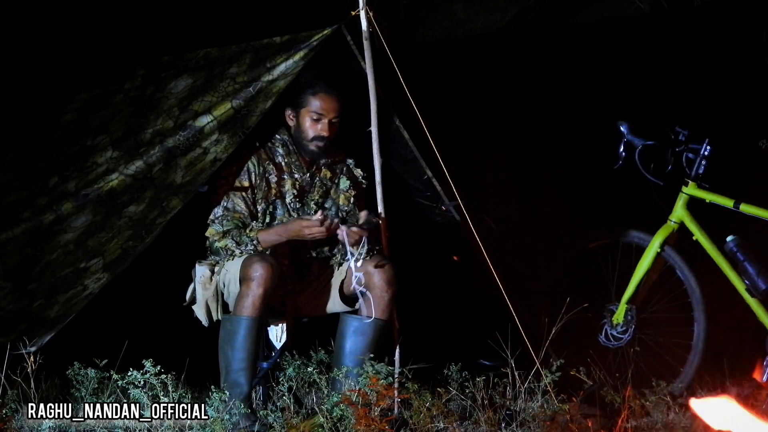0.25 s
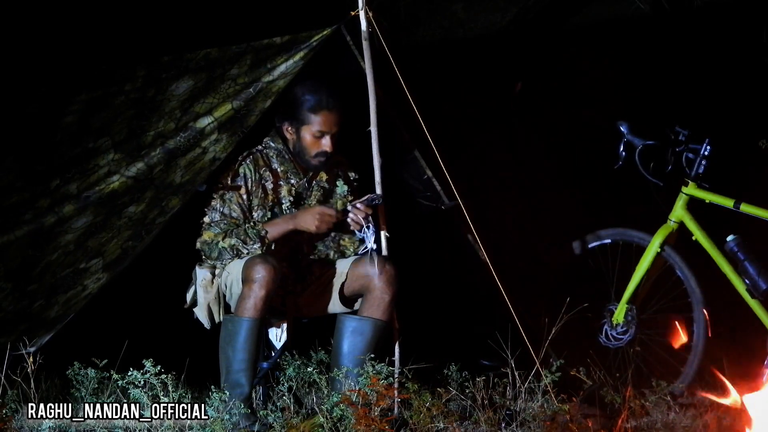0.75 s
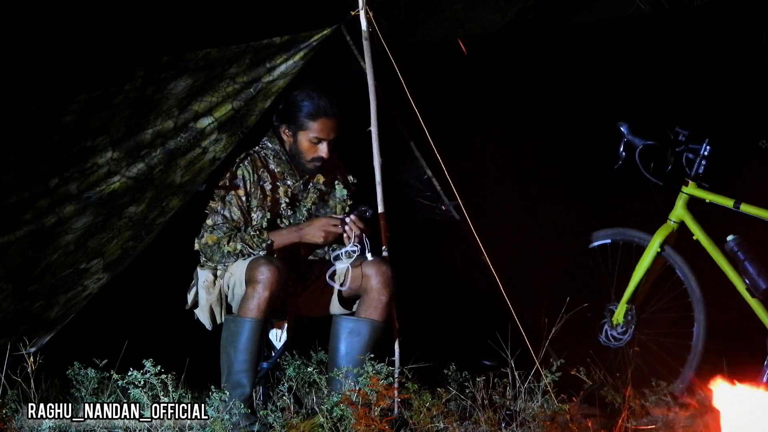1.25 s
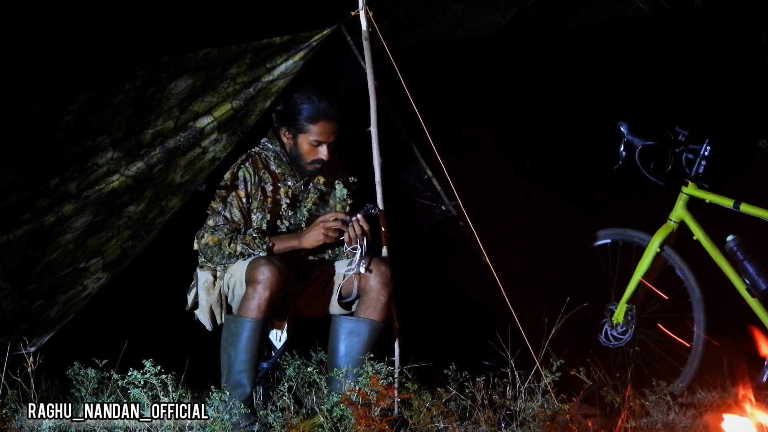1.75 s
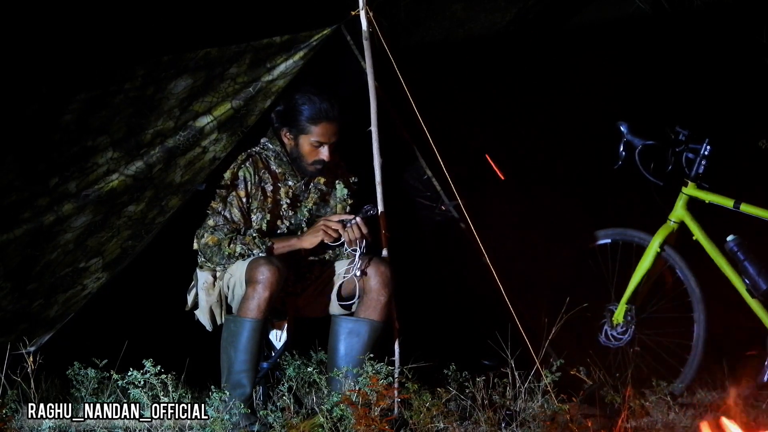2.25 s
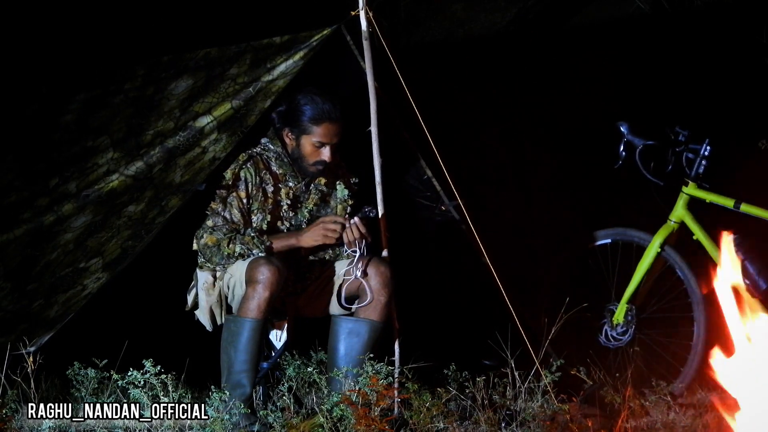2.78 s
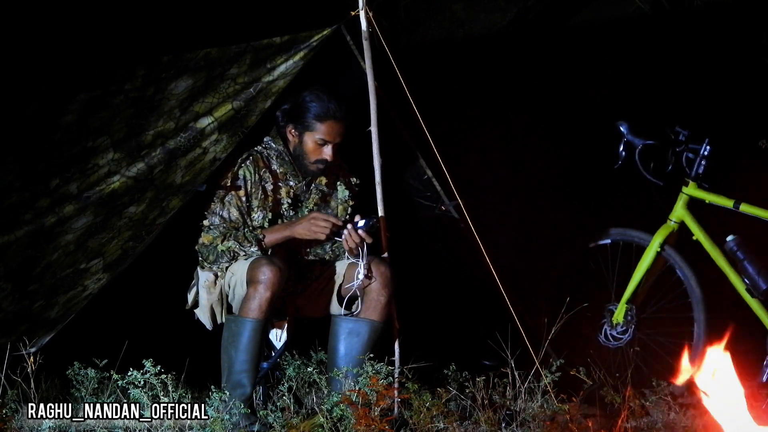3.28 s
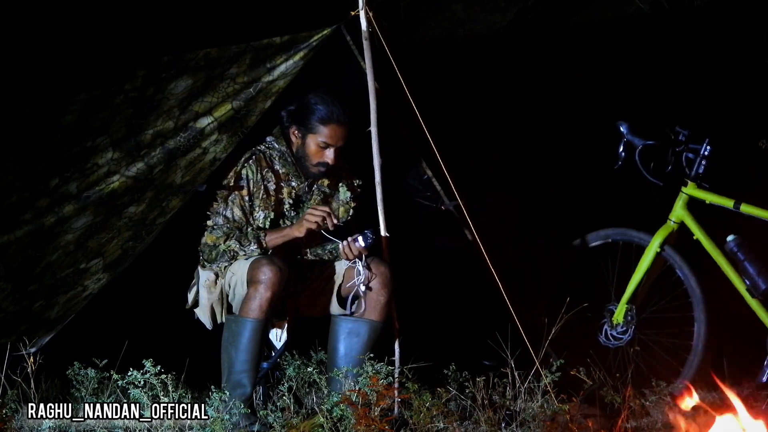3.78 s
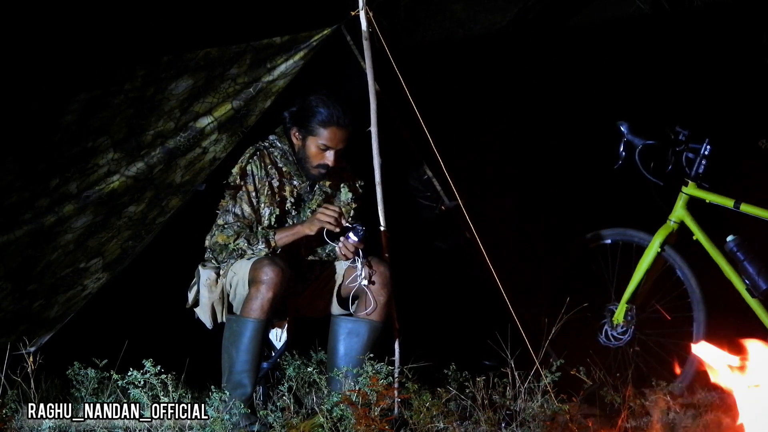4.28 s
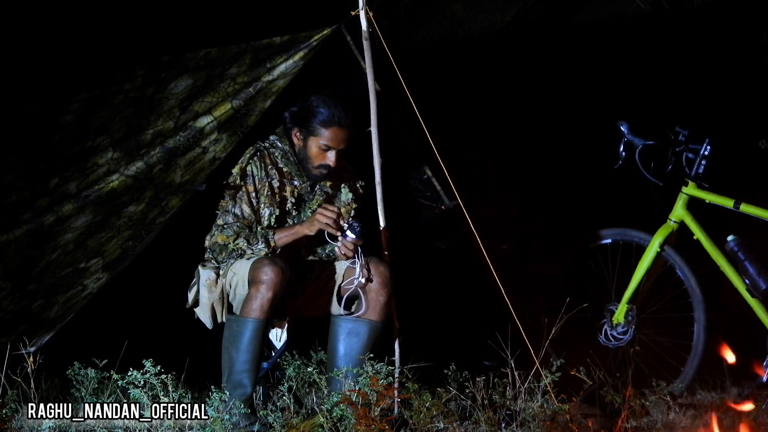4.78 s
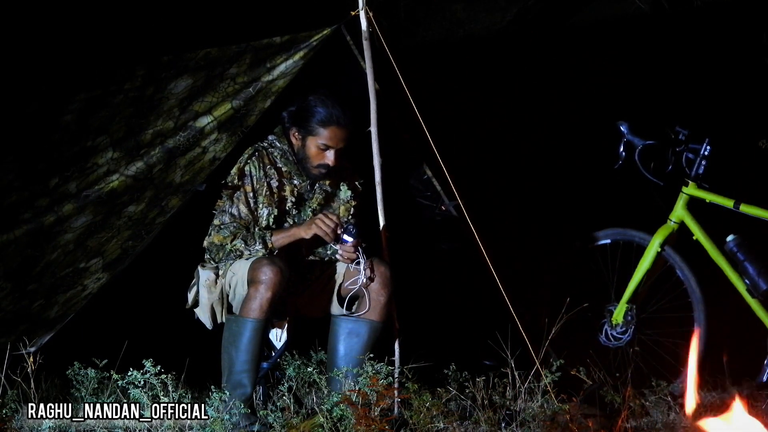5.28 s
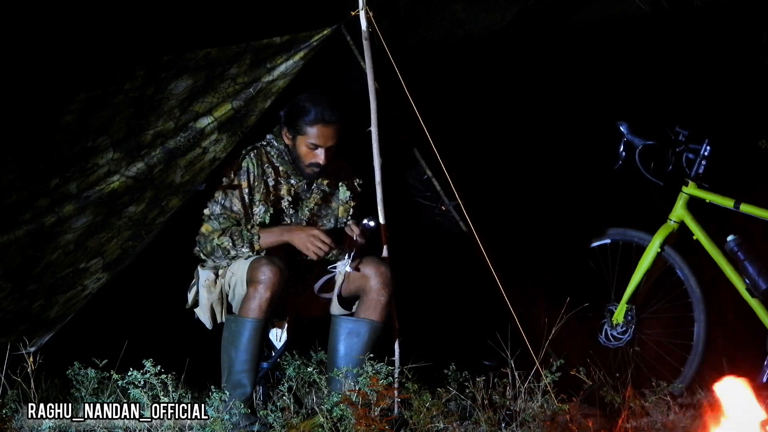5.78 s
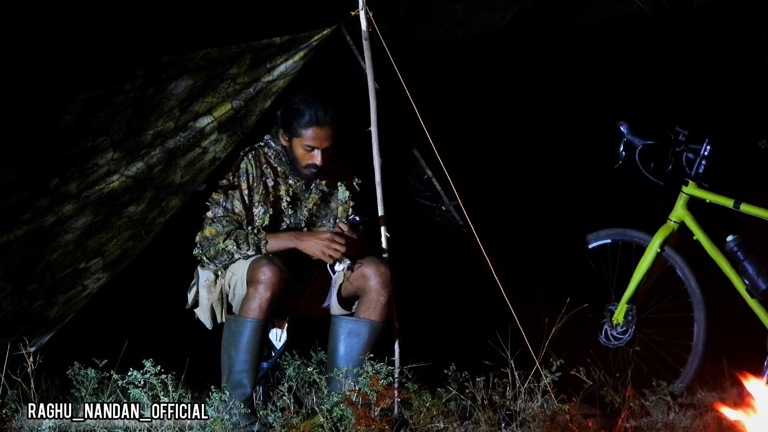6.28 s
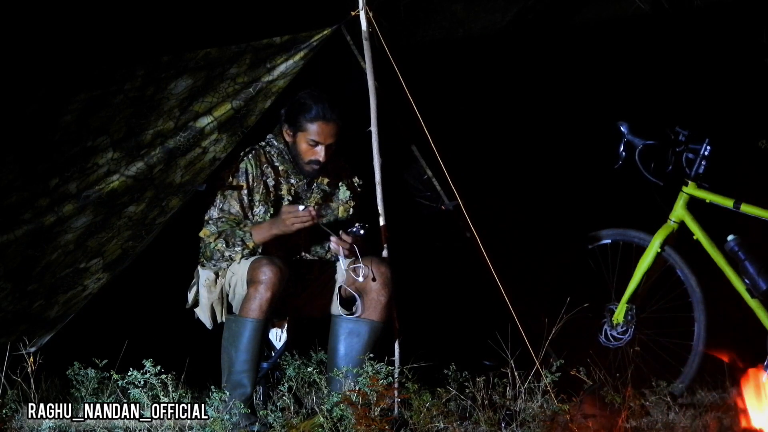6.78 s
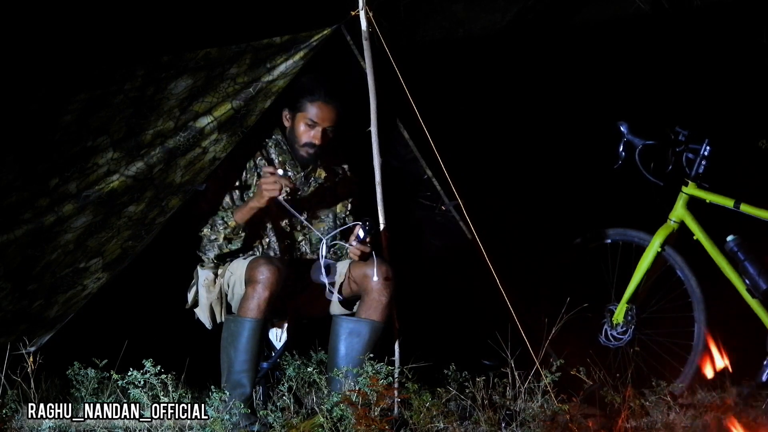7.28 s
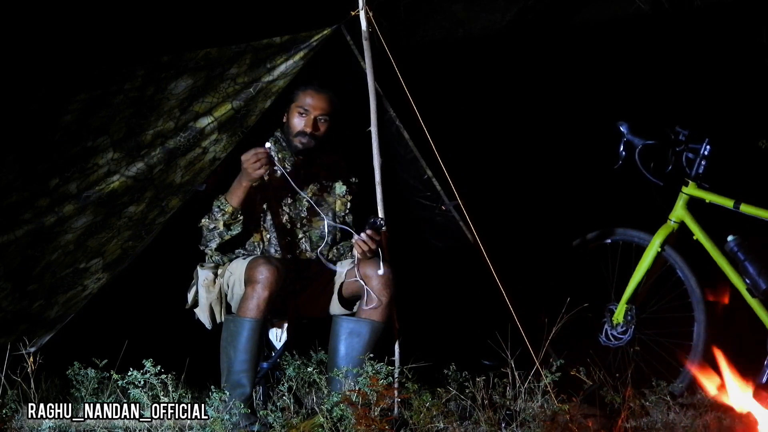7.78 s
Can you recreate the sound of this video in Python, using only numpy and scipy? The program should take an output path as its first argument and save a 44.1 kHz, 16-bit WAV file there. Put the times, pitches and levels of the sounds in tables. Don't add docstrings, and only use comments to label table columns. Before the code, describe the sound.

Fast high cricket chirping and buzzing insects fill the dark scrub as a campfire crackles softly, with sharp pops and a loud split near six seconds.

```python
import sys
import numpy as np
from scipy import signal
from scipy.io import wavfile
from scipy.ndimage import uniform_filter1d

SR = 44100
rng = np.random.default_rng(int(sys.argv[2]) if len(sys.argv) > 2 else 0)


def generate_wav(signal):
    frames = np.transpose(np.atleast_2d(signal))
    scaled = np.clip(frames, -1, 1) * 32767
    pcm = np.round(scaled).astype(np.int16)
    wavfile.write(sys.argv[1], SR, pcm)


def level_to_linear(level):
    exponent = np.asarray(level, float) / 20
    return 10 ** exponent


N = 354769
TIME = np.arange(N) / SR


def evened(x):
    return x / np.sqrt(np.mean(abs(x) ** 2) + 1e-20)


def curve(rows, column=1):
    return np.interp(TIME, [r[0] for r in rows], [r[column] for r in rows])


def sides(pan_db, lead_rad=0.):
    return np.array([[level_to_linear(pan_db / 2) * np.exp(1j * lead_rad)], [level_to_linear(-pan_db / 2)]])


def add(mix, s, sound):
    part = mix[:, round(s * SR):][:, :sound.shape[-1]]
    part += sound.real[..., :part.shape[1]]


def play(times_s, gains, sound):
    train = np.zeros(N, complex)
    index = np.round(np.asarray(times_s) * SR).astype(int)
    np.add.at(train, np.clip(index, 0, N - 1), gains)
    return signal.oaconvolve(train, sound)[:N]


def beats(first_s, last_s, gap_s):
    u = np.linspace(0, 1, round((last_s - first_s) / gap_s) + 1)
    return first_s + u * (last_s - first_s), u


def stroke(start_hz, end_hz, length_s, rise):
    u = np.arange(round(length_s * SR)) / (length_s * SR)
    skew = np.log(.5) / np.log(np.clip(rise, .05, .95))
    shape = np.sin(np.pi * u ** skew) ** 2
    return shape * np.exp(2j * np.pi * np.cumsum(start_hz + (end_hz - start_hz) * u) / SR)


def leaves(x, t60_s, wet_db):
    t = np.arange(SR // 6) / SR
    taps = rng.choice([-1., 1.], (2, len(t))) * (rng.random((2, len(t))) < .05)
    taps *= level_to_linear(-60 * t / t60_s)
    taps /= np.linalg.norm(taps, axis=1, keepdims=True)
    return x + level_to_linear(wet_db) * signal.oaconvolve(x, taps, axes=1)[:, :N]


def near_cricket():
    # (first [s], last [s], first level [dB], last level [dB], mid-run haste [ms])
    runs = [
        (0.045, 1.4514, -35.5, -35, 6.6),
        (1.569, 2.692, -34, -34, 9.1),
        (2.7993, 3.8233, -34, -35.7, 11.3),
        (3.9444, 4.9525, -36.2, -38, 8.6),
        (5.034, 5.155, -38, -37, 3),
        (5.271, 5.9313, -37, -36.5, 12),
        (6.0436, 6.893, -35.5, -36, 12),
        (7.0086, 7.965, -35.8, -33.5, 5),
    ]
    times, levels = [], []
    for first, last, a_db, b_db, haste_ms in runs:
        t, u = beats(first, last, .0602)
        times.append(t - haste_ms / 1000 * np.sqrt(abs(np.sin(np.pi * u))))
        levels.append(a_db + (b_db - a_db) * u)
    s, db = np.hstack(times), np.hstack(levels)
    chance = rng.random((len(s), 4))
    one = stroke(8200, 6518, 0.0155, 0.49)
    x = 0
    for k, gap_s in enumerate((-.0005, .0192)):
        gains = level_to_linear(db - 6.0 + 3.9 * chance[:, k]) * np.exp(2j * np.pi * chance[:, k + 2])
        x = x + play(s + gap_s, gains, one)
    x = x + .36 * np.roll(x, round(.0033 * SR)) + .22 * np.roll(x, round(.0074 * SR))
    return leaves((sides(-8, -0.022) * x).real, 0.042, -1.8)


def pop(cycle_ms, thump_db):
    t_ms = np.arange(900) / SR * 1000
    u = t_ms / max(cycle_ms, .1)
    burst = -1.3 * np.sin(2 * np.pi * (u - .1)) * np.exp(-((u - .55) / 0.44) ** 2)
    late = np.maximum(t_ms - 2.4, 0) / 3.64
    return burst + level_to_linear(thump_db + 6.5) * np.sin(2 * np.pi * late) * np.exp(-1.1 * late)


def pops():
    # (time [s], peak [dB], cycle [ms], left-right [dB])
    light = [(.529, -21.5, .89, -2.5), (.823, -32, .84, -5.5), (1.942, -31, 0.87, 0),
             (2.159, -27, 0.58, -6), (2.506, -37.5, 0.73, 0), (2.613, -36.5, 0.87, 0),
             (3.111, -40, 0.54, -1.5), (3.708, -40.5, 0.51, 2.0), (4.034, -41.5, .98, -4),
             (4.056, -41, 1, -6), (4.62, -32.5, 0.56, 0), (4.751, -40.5, .73, -.5), (4.85, -42.5, 0.87, -6),
             (5.422, -36, 1, 0), (5.956, -40.5, 0.86, -1), (6.066, -23, .63, -4), (6.687, -33.5, 0.68, 0),
             (7.068, -36.5, 1, 0), (7.196, -38, 1, 0), (7.406, -37, .99, -.5), (7.489, -43, 1, -.5)]
    # (time [s], peak [dB])
    faint = [(.472, -49), (1.284, -49), (1.79, -48), (1.837, -48), (2.799, -44), (2.869, -52), (4.404, -56),
             (4.448, -50), (5.492, -46), (5.788, -49), (6.17, -51), (7.591, -44.5)]
    # (time [s], peak [dB], cycle [ms], thump re peak [dB], left-right [dB])
    heavy = [
        (1.591, -50, .94, 5, 0),
        (2.356, -16, 0.83, -12.5, -4.5),
        (2.475, -45, 1, -2, 0),
        (3.024, -44.5, 1, -3, -5),
        (3.2, -50, .73, 2, -3),
        (4.341, -42.5, 1, -8, 0),
        (5.639, -48, .92, 5, -1.5),
        (6.094, -21, 0.79, -29, -1),
        (6.351, -43, 0.65, -9, 2.0),
    ]
    settle = [
        (6.098, -37, 2.3, -30, -2),
        (6.1014, -31, 1.7, -30, -2),
        (6.105, -37, 2, -33, -2),
    ]
    events = [(s, db, ms, -58.5 - db, pan_db) for s, db, ms, pan_db in light]
    events += [(s, db, .98, -58.5 - db, -.5) for s, db in faint]
    x = np.zeros((2, N))
    for s, db, cycle_ms, thump_db, pan_db in events + heavy + settle:
        add(x, s + .0006, sides(pan_db) * level_to_linear(db + 1) * pop(cycle_ms, thump_db))
    crackles = level_to_linear(-67.5 + 6.7 * np.minimum(rng.exponential(1, N), 3))
    crackles *= rng.random(N) < 45 / SR
    x += signal.oaconvolve(crackles, pop(0.95, -18))[:N]
    return leaves(x, .06, -16)


def ticks():
    # (time [s], peak [dB], body re peak [dB], left-right [dB])
    sparks = [(0.614, -25.5, -35, -3.0), (0.7906, -31, -33, -5.0), (0.823, -23, -35, -2.5),
              (1.029, -30, -32, -2.0), (1.1717, -29.5, -31, -3.0), (1.2474, -22.5, -41, 0.0),
              (1.4012, -26, -44, -4.0), (1.837, -25, -49, -2.0), (2.1595, -20.5, -37, 1),
              (2.351, -29, -22.5, -5.0), (3.1113, -33.5, -32, -6.5), (3.4211, -29, -40, -5.0),
              (3.8117, -33, -36, -5.5), (3.953, -27, -29, -4.5), (3.9903, -31, -31, -5.0),
              (4.0562, -27, -31.5, -2), (4.1175, -29, -34, -5.0), (4.1902, -21, -33, 1),
              (4.5416, -30, -43, -3.0), (4.7127, -25.5, -36, -2), (4.8504, -32, -43, -1),
              (5.0384, -28, -33, -4), (5.8512, -30, -29, -2), (6.3899, -34, -35, -8),
              (7.5937, -34, -35, -3), (7.9129, -26, -34, -3.0), (7.9279, -27, -48, -2)]
    snap = [
        (6.0635, -30, -36, 0),
        (6.0656, -18, -19, -1),
        (6.094, -36, -14, -3),
    ]
    x = np.zeros((2, N))
    t = np.arange(300) / SR
    bright = signal.butter(2, [8600, 13000], "band", fs=SR, output="sos")
    for s, db, body_db, pan_db in sparks + snap:
        burst = .12 * rng.standard_normal(len(t)) * level_to_linear(-60 * t / .006) - (t == 0)
        body = np.convolve(burst, np.hanning(5))[:len(t)]
        tick = 7.7 * signal.sosfilt(bright, burst) + level_to_linear(body_db + 30.0) * body
        add(x, s + .0012, sides(pan_db) * level_to_linear(db - 1.5) * tick)
    return leaves(x, .03, -9)


def katydid(per_s, level_db, pan_db):
    # (time [s], direct stroke [dB], leaf echo [dB])
    buzz = [(0.0, -53.5, -51), (0.36, -50.5, -52), (0.94, -55, -61), (4.07, -51, -54.5), (5.93, -54.5, -53),
            (6.54, -49, -50), (8.04, -50.5, -53)]
    s = np.arange(0, N / SR, 1 / per_s)
    chance = rng.standard_normal((len(s), 4))
    phase = np.exp(1.2j * np.cumsum(chance[:, 1]))
    sharp = np.convolve(stroke(15300, 10500, .0026, .66), [1, 1.3j, -.6])
    direct = evened(play(s, level_to_linear(1.3 * chance[:, 0]) * phase, sharp))
    direct = direct + .4 * evened(play(s + .0012, phase, stroke(12500, 11900, .003, .3)))
    echo_gains = level_to_linear(0.59 * chance[:, 2]) * np.exp(.95j * np.cumsum(chance[:, 3]))
    echo = play(s + 0.0025, echo_gains, stroke(11580, 10400, 0.0047, 0.17))
    x = level_to_linear(curve(buzz) + 4.0) * evened(direct) + level_to_linear(curve(buzz, column=2) + 1) * evened(echo)
    return leaves((sides(pan_db, -1.2) * level_to_linear(level_db) * x).real, 0.12, -5.5)


def choir(hz, spread_hz, glide_hz, per_s, spread_per_s, length_s, pan_db, wander, count):
    x = 0
    for k in range(count):
        pace, start, place = rng.uniform(-1, 1, 3) * (k > 0)
        pitch = np.sin(k * np.pi * (3 - np.sqrt(5)))
        s = np.arange(abs(start) / per_s, N / SR, 1 / (per_s + spread_per_s * pace))
        chance = rng.standard_normal((len(s), 3))
        centre = hz + spread_hz * pitch
        one = stroke(centre + glide_hz / 2, centre - glide_hz / 2, length_s, 0.43)
        gains = level_to_linear(2.0 * chance[:, 1]) * np.exp(1j * wander * np.cumsum(chance[:, 2]))
        voice = play(s + .00002 * wander * np.cumsum(chance[:, 0]), gains, one)
        x = x + (sides(pan_db + 2.5 * place, 1.1 * place) * voice).real * level_to_linear(1.6 * (k == 0))
    x = leaves(x, 0.099, -9.0)
    return x / np.sqrt(np.mean(x.mean(0) ** 2))


def tree_crickets():
    # (time [s], level [dB])
    trill = [(0.0, -46.5), (0.89, -46), (1.66, -46.5), (7.08, -44.5), (7.3, -45.5), (8.04, -46.5)]
    return level_to_linear(curve(trill)) * choir(2891.6, 111.7, 403, 53.8, 5.0, 0.01624, -9.0, 1.4, count=10)


def ground_crickets():
    # (time [s], level [dB])
    grass = [(0.0, -52), (0.04, -56), (1.05, -55.5), (1.1, -53), (8.04, -54)]
    return level_to_linear(curve(grass) - 0.5) * choir(4718, 68, 263, 60, 15.0, 0.011, -0.55, 1.5, count=6)


def farther_crickets():
    return level_to_linear(-56.5) * choir(7600, 560, 1255, 33, 6.0, 0.0133, 3.4, 1.5, count=6)


def field_cricket():
    # (first [s], last [s], first level [dB], last level [dB])
    bouts = [
        (0.156, .834, -54, -52.5),
        (1.095, 2.568, -52.5, -57.5),
        (2.815, 4.017, -53.5, -57),
        (4.264, 7.918, -56.5, -56),
    ]
    times, levels = [], []
    for first, last, a_db, b_db in bouts:
        t, u = beats(first, last, .242)
        times.append(t)
        levels.append(a_db + (b_db - a_db) * u)
    s, db = np.hstack(times), np.hstack(levels)
    one = stroke(5800, 5250, 0.0152, 0.33)
    chance = rng.standard_normal((len(s), 4))
    x = 0
    for k, (gap_s, more_db) in enumerate(((-.038, 0), (-.006, 3.5), (.038, 3.5), (.082, 3.5))):
        x = x + play(s + gap_s, level_to_linear(db + more_db + 2 * chance[:, k]), one)
    return leaves((sides(-6) * x).real, .12, -2)


def rasp(count, rough, size):
    z = uniform_filter1d(rng.standard_normal((2, count)), size=size) * np.sqrt(size / 2)
    return 1 - rough + rough * (z[0] + 1j * z[1])


def frog():
    # (first [s], last [s], level [dB], start [Hz], end [Hz])
    croaks = [
        (.005, .158, -50, 1770, 1240),
        (.055, .245, -50.5, 2200, 1900),
        (1.425, 1.425, -49, 2540, 1600),
        (2.643, 2.643, -49, 2510, 1700),
        (3.78, 3.93, -53, 2250, 1680),
        (6.165, 6.31, -50, 2280, 1600),
        (7.585, 7.585, -47, 2380, 1780),
    ]
    chuckles = [
        (0.211, 0.243, -48, 1610, 1950),
        (.295, .355, -52, 1880, 1550),
        (6.323, 6.349, -49.5, 1880, 1600),
    ]
    x = np.zeros((2, N))
    for gap_s, rows in ((.05, croaks), (.019, chuckles)):
        for first, last, db, a_hz, b_hz in rows:
            for s in beats(first, last, gap_s)[0]:
                size, tune = rng.standard_normal(2)
                wobble = 1 + .025 * tune
                one = stroke(1.04 * a_hz * wobble, 0.943 * b_hz * wobble, 0.0176, 0.36)
                add(x, s, level_to_linear(db + 1.4 * size) * one * rasp(len(one), .55, size=60))
    return leaves(x, .08, -2)


def damp_twig():
    # (time [s], length [s], level [dB], start [Hz], end [Hz])
    squeaks = [
        (.88, .1, -52, 450, 470),
        (1.425, .09, -53, 470, 515),
    ]
    x = np.zeros((2, N))
    for s, length_s, db, a_hz, b_hz in squeaks:
        rough = rasp(round(length_s * SR), .3, size=400)
        for k, tone_db in enumerate((1, -2, -17, -17, -22), 1):
            one = stroke(k * a_hz, k * b_hz, length_s, .6)
            add(x, s, level_to_linear(db + 3 + tone_db) * one * rough)
    return leaves(x, .08, -2)


def hiss(table, patchy_db, flicker_db):
    frames, hz = N // 256 + 5, np.fft.rfftfreq(1024, 1 / SR)
    f, *columns = np.transpose(table)
    left_db, right_db, same = (np.interp(np.log(hz + 1), np.log(f), c)[:, None] for c in columns)
    a, b, c, d, patches = rng.standard_normal((frames, 513, 5)).T
    patches = evened(uniform_filter1d(uniform_filter1d(patches, size=12, axis=0), size=10, axis=1))
    flicker = evened(uniform_filter1d(rng.standard_normal(frames), size=3))
    same = np.clip(same, 0, 1)
    left = a + 1j * b
    right = same * left + np.sqrt(1 - same ** 2) * (c + 1j * d)
    z = np.array([level_to_linear(left_db) * left, level_to_linear(right_db) * right])
    z *= level_to_linear(patchy_db * patches + flicker_db * flicker) * np.sqrt(SR / 1024)
    return signal.istft(z, nperseg=1024, noverlap=768)[1][:, :N]


def flames():
    # (frequency [Hz], left [dB per Hz], right [dB per Hz], left-right likeness [0-1])
    flutter = [(30, -70.5, -88, 0.5), (69.5, -77.5, -74.5, 0.77), (148, -80, -75.5, 0.81),
               (330, -83.5, -81.5, 0.69), (710, -90.5, -89, 0.64), (1210, -95, -94.5, 0.45),
               (2020, -95.5, -96.5, 0.55), (2860, -98.5, -96, 0), (4020, -101, -101, .5),
               (4130, -120, -120, .4)]
    # (time [s], level [dB])
    flare = [(0.0, -54.5), (0.58, -58.5), (1.63, -56), (1.9, -57.5), (3.15, -57), (3.38, -54.5),
             (6.47, -57.5), (6.87, -52), (7.72, -56.5), (8.04, -54)]
    return level_to_linear(0.71 * (curve(flare) + 56.5)) * hiss(flutter, 1.82, 1.82)


def far_chorus():
    # (frequency [Hz], left [dB per Hz], right [dB per Hz], left-right likeness [0-1])
    far = [(3706, -115, -115, 0.7), (3957, -90, -85, 0.26), (4470, -80.5, -78.5, 0.47),
           (5230, -81.5, -82.5, 0.33), (5944, -94.5, -93, 0.2), (6440, -81.5, -82, 0.32),
           (7140, -76.5, -83.5, 0.87), (8300, -78, -80, 0.35), (9640, -84.5, -87, 0),
           (9970, -91.5, -88.5, 0.56), (12000, -91.5, -82.5, 0.1), (14100, -92, -88, 0.1),
           (15800, -90, -89, .3), (15900, -100, -107.5, 0.2)]
    return hiss(far, 1.82, 0.6)


def gusts():
    # (time [s], level [dB])
    gust = [(0.0, -45), (1.3, -57.5), (1.41, -46.5), (1.57, -53), (3.29, -68.5), (3.47, -50.5), (4.03, -49),
            (4.66, -55), (4.97, -48.5), (5.15, -55), (7.97, -52), (8.04, -51)]
    band = signal.butter(2, [12, 55], "band", fs=SR, output="sos")
    x = signal.sosfilt(band, rng.standard_normal((2, N)))
    return level_to_linear(curve(gust) + 4.0) * evened(x)


def scene():
    insects = near_cricket() + katydid(190.3, -1.7, -12.5) + katydid(199.2, -12, -1.5)
    insects += tree_crickets() + ground_crickets() + farther_crickets() + field_cricket()
    fire = pops() + ticks() + flames() + damp_twig()
    return insects + fire + frog() + far_chorus() + gusts()


def roll_off(x):
    return signal.sosfilt(signal.butter(12, 16500, fs=SR, output="sos"), x)


def record(dry):
    # (frequency [Hz], level [dB per Hz])
    masked = [(1500, -110), (2400, -99), (3200, -96), (3800, -96.5), (4200, -90.5), (6000, -92),
              (8000, -100), (10200, -89), (11000, -96), (14500, -100), (15700, -92)]
    window = np.sin(np.pi * (np.arange(2048) + .5) / 2048)
    hz, _, z = signal.stft(dry, SR, window, nperseg=2048, noverlap=1024, scaling="psd")
    power = 2 * abs(z[:, :1024]).reshape(2, 128, 8, -1) ** 2
    drift_db = 3.0 * evened(uniform_filter1d(rng.standard_normal(z.shape[2]), size=4))
    limit_db = np.interp(hz[4::8], *np.transpose(masked))[:, None]
    weak = power.mean((0, 2)) < level_to_linear(2 * limit_db - 2 + drift_db)
    z[:, :1024] *= np.where(np.repeat(weak, 8, 0), level_to_linear(-45), 1)
    z[:, hz > 15720] *= level_to_linear(-32)
    kept = signal.istft(z, SR, window, nperseg=2048, noverlap=1024, scaling="psd")[1][:, :N]
    return roll_off(kept)


dry = scene()
out = record(dry)
generate_wav(out)
```